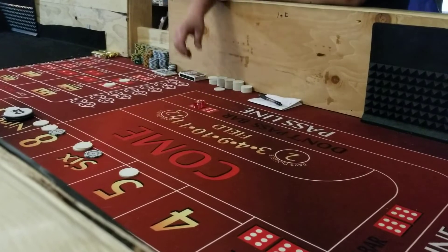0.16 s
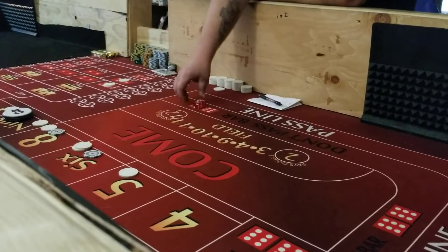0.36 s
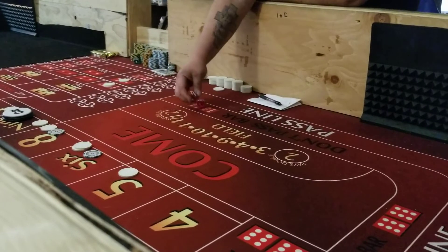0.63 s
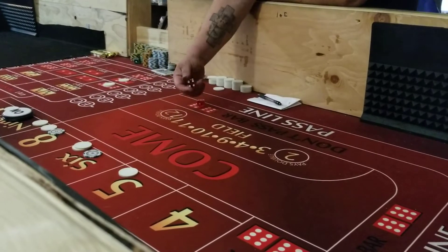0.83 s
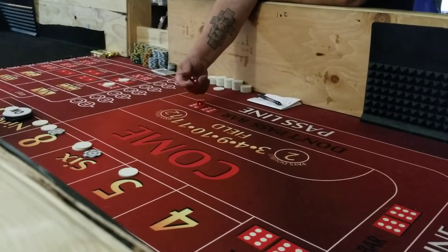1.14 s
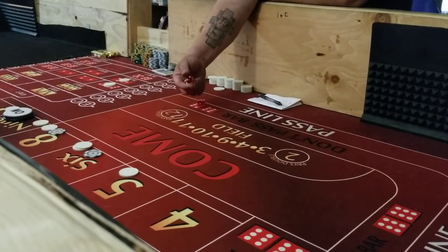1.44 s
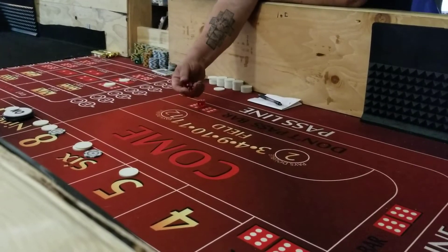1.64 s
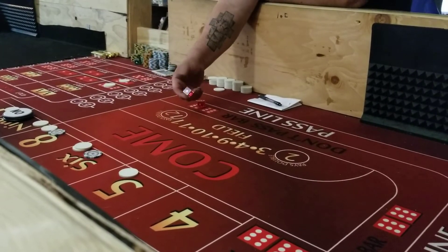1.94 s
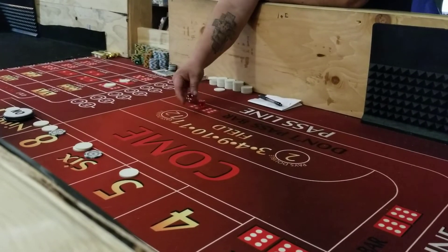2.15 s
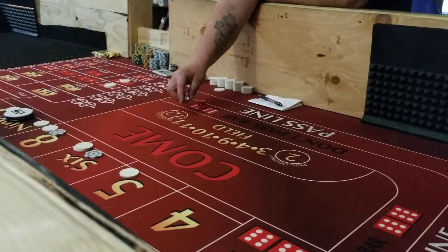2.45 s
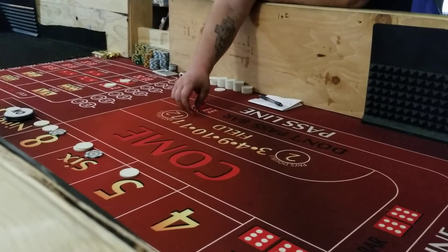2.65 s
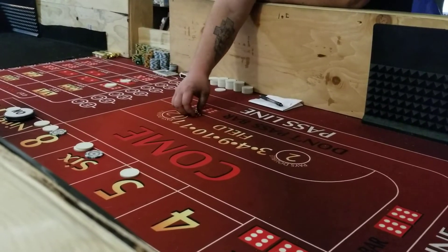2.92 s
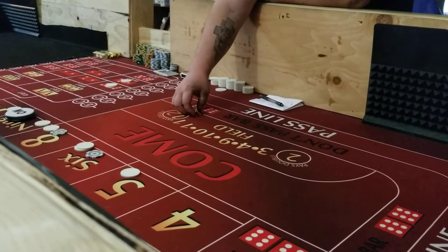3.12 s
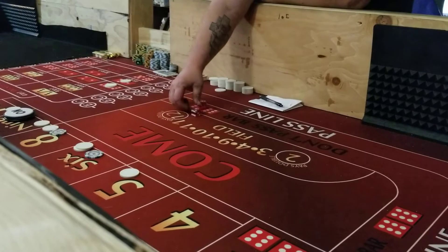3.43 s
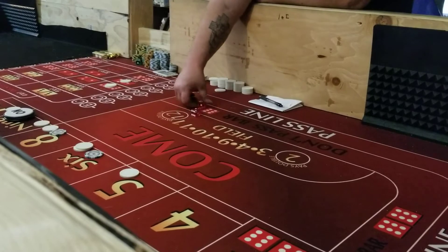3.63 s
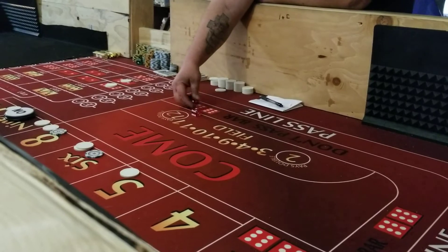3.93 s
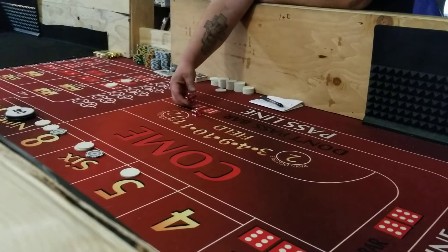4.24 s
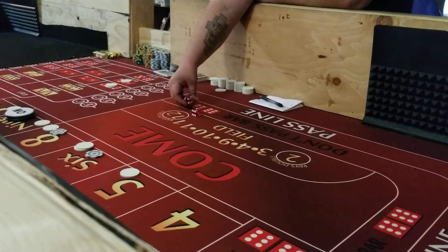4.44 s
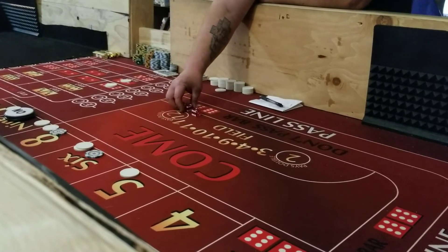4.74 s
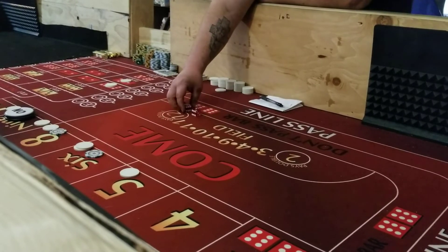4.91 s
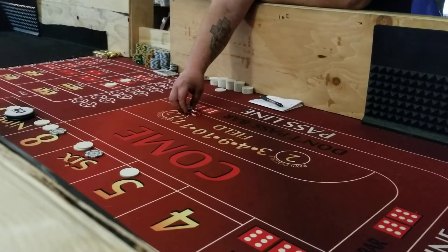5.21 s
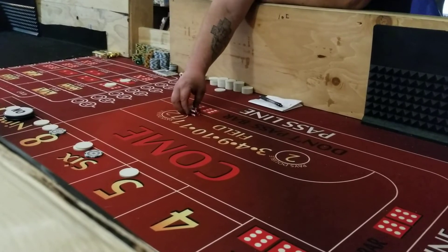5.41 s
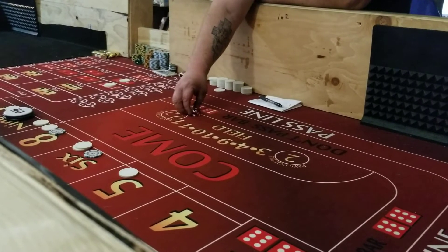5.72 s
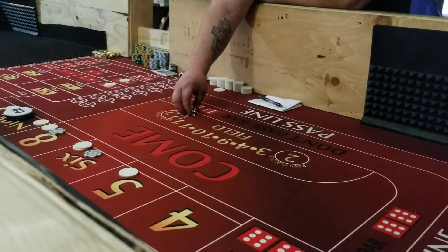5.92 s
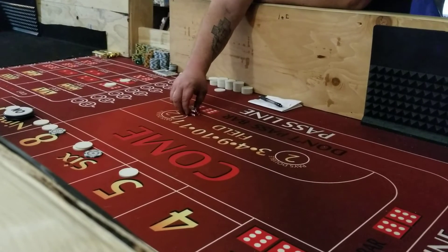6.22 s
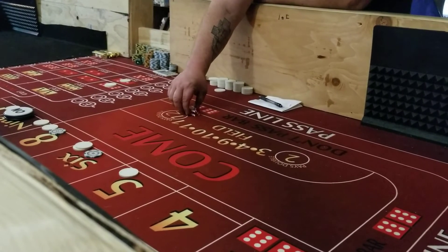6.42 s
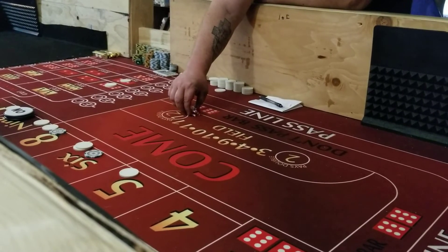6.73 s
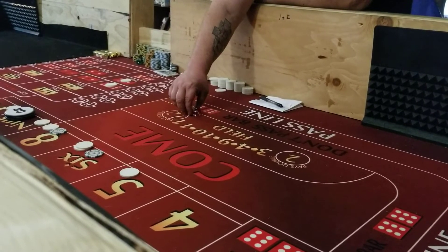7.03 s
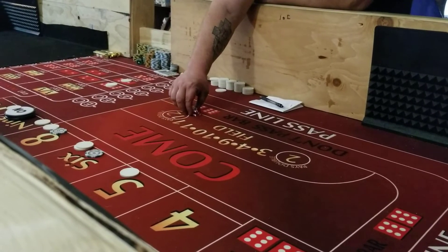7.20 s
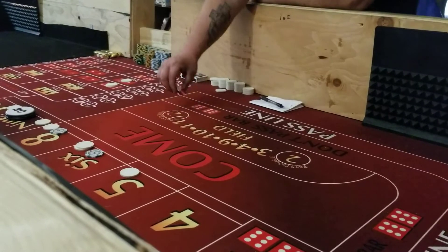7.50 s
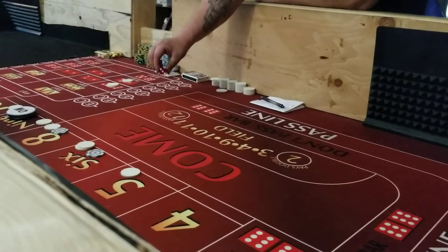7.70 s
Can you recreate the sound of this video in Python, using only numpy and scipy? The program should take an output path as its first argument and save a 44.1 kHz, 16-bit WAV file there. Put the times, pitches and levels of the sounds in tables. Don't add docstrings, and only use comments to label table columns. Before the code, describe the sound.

Close to a felt-covered wooden table, chips purr through a thumb and tick down in a quick run that thins to separate clacks. Dice and pieces then tap gently in the hand, with skin brushing cloth. A low double-bump thud lands midway, quiet follows, then small taps, crisp clicks and a longer swishing drag. Short indoor reverberation, steady faint hum, sound leaning to the right channel.

```python
import sys
import numpy as np
from scipy import signal
from scipy.fft import rfft, irfft, next_fast_len
from scipy.io import wavfile
from scipy.ndimage import uniform_filter1d

SR = 44100
rng = np.random.default_rng(int(sys.argv[2]) if len(sys.argv) > 2 else 0)


def volts(x):
    e = np.asarray(x, float) / 20
    return 10 ** e


def unload_audio(sound):
    columns = np.transpose(np.atleast_2d(sound))
    steps = np.round(np.clip(columns, -1, 1) * 32767)
    wavfile.write(sys.argv[1], SR, steps.astype(np.int16))


N = 346626
SIZE = next_fast_len(N + SR)
FREQ = np.maximum(np.arange(SIZE // 2 + 1) * SR / SIZE, 1)
STEP = 64

# [f/Hz, level/dB]
SHADOW = [(100, -7), (300, -3), (700, -3), (1500, -12.5), (6800, -10.5), (7500, -39), (8300, -4.5),
          (10000, 0.5), (13000, -15.5)]
# [f/Hz, level/dB]
KNOCK = [(150, -24), (400, -2), (800, 0), (1300, -13.5), (2200, -15), (3000, -32.5), (5000, -49)]


def curve(table, hz=FREQ):
    points, values = np.array(table).T[:2]
    return np.interp(np.log(hz), np.log(points), values)


def causal(table):
    size = 1024
    hz = np.maximum(np.arange(size // 2 + 1) * SR / size, 1)
    cepstrum = irfft(np.log(volts(curve(table, hz))))
    cepstrum[1:size // 2] *= 2
    cepstrum[size // 2 + 1:] = 0
    pulse = irfft(np.exp(rfft(cepstrum)))
    return rfft(pulse / np.abs(pulse).max(), SIZE)


def mode(hz, width):
    return 1j * FREQ * width / (hz ** 2 - FREQ ** 2 + 1j * FREQ * width)


def ring(modes):
    return sum((-1) ** k * volts(db) * mode(hz, width) * SR / width / 6
               for k, (hz, width, db) in enumerate(modes))


def noise(shape):
    x = rfft(rng.standard_normal(SIZE)) * shape
    return x / np.sqrt(np.mean(irfft(x, SIZE) ** 2))


def flicker(rate):
    k = int(SR / rate)
    held = np.repeat(rng.standard_normal(SIZE // k + 1), k)
    return uniform_filter1d(held, k)[:SIZE]


def room(direct):
    # [f/Hz, T60/s]
    room_t60 = [(150, 0.2), (500, 0.34), (2000, 0.32), (6000, 0.34), (13000, 0.23)]
    # [delay/s, level/dB]
    echoes = [(.0028, -4.5), (.006, -2), (0.016, -34), (0.028, -50)]
    # [f/Hz, level/dB]
    tail_db = [(150, -16), (1000, -13), (6000, -18.5), (13000, -28.5)]
    t = np.arange(SR // 2) / SR
    path = np.zeros(len(t))
    white = rfft(rng.standard_normal(len(t)))
    hz = np.maximum(np.arange(len(white)) * 2., 1)
    for centre in 60 * 2. ** np.arange(9):
        octave = np.cos(np.pi / 2 * np.clip(np.log2(hz / centre), -1, 1)) ** 2
        fade = 1000. ** (-t / curve(room_t60, centre)) * (1 - np.exp(-t / 0.0003))
        path += volts(curve(tail_db, centre)) * fade * irfft(white * octave, len(t))
    contact_s = 0.0003
    for delay, db in [(0.00092, 0), *echoes]:
        late = np.maximum(t - delay, 0)
        chatter = (t >= delay) * np.exp(-late / contact_s) * rng.standard_normal(len(t))
        path += 0.45 * direct * volts(db) * chatter
    path[:2] += direct * volts(-8) * np.array([1, -1])
    return rfft(path, SIZE)


def spots(times):
    turn = np.pi * (times * 7919 % 1 - .25)
    return np.array([np.cos(turn), np.sin(turn)])


def blows(times, db):
    train = np.zeros((2, SIZE))
    train[:, (times * SR).astype(int)] = volts(db) * spots(times)
    return rfft(train)


def rung(events, cycles, extras, level_db):
    s, db, hz, *rel_db = np.transpose(events)
    turns = np.arange(SR // 8) / SR * hz[:, None]
    age = np.pi * turns / cycles
    rings = volts(db + level_db)[:, None] * age * np.exp(1 - age) * np.sin(2 * np.pi * turns)
    train = np.zeros((2, SIZE))
    for start, sound, share in zip((s * SR).astype(int), rings, spots(s).T):
        train[:, start:start + len(sound)] += share[:, None] * sound
    return rfft(train) + sum(blows(s, db + level_db + r) * x for r, x in zip(rel_db, extras))


def background():
    # [f/Hz, level/dB]
    hum_lines = [(59.2, -63.5), (118.4, -64.5), (177.6, -75.5), (301.5, -74.5), (360.7, -75.5),
                 (422, -74.5), (581.4, -91.5), (640.6, -85)]
    # [f/Hz, level/dB per Hz]
    rumble = [(20, -34), (42, -8.5), (58, -3.5), (82, -15.5), (120, -11), (230, -10.5), (450, -16.5),
              (650, -25), (1000, -33), (2000, -38), (5000, -42), (9000, -43.5), (13000, -40), (16000, -39)]
    # [f/Hz, level/dB]
    rumble_shadow = [(100, 3), (300, -8.5), (1000, -6.5), (2500, -5), (5000, -1.5)]
    t = np.arange(SIZE) / SR
    hum = sum(volts(db + 2.5 + 2.13 * flicker(7)) * np.sin(2 * np.pi * (hz * t + rng.random()))
              for hz, db in hum_lines)
    likeness_hz, rumble_db = 515, -62
    shared = 1 / np.sqrt(1 + (FREQ / likeness_hz) ** 1.86)
    common = noise(1)
    shape = volts(curve(rumble))
    shape = shape * volts(rumble_db) / np.sqrt(np.mean(shape ** 2))
    ports = [shape * (np.sqrt(shared) * common + np.sqrt(1 - shared) * noise(1)) + rfft(hum)
             for _ in range(2)]
    lean = volts(curve(rumble_shadow) / 2)
    return irfft([ports[0] * lean, ports[1] / lean], SIZE)


def strokes(table):
    s, rise, hold = np.abs(np.array(table)[:, :3].T[:, :, None])
    t = np.arange(SIZE // STEP + 1) * STEP / SR
    fall = 0.081 + rise
    return volts(-20 * (np.maximum(s - t, 0) / rise + np.maximum(t - s - hold, 0) / fall))


def grain(gain, shape, hz):
    smooth = uniform_filter1d(np.repeat(gain, STEP)[:SIZE], size=300)
    gain = smooth * volts(4 + 1.6 * flicker(60))
    sides = volts(np.array([[curve(SHADOW, hz)], [0]]))
    return sides * gain * irfft([noise(shape), noise(shape)], SIZE)


def rubs():
    # [full pressure t/s, rise/s, hold/s, level/dB, centre f/Hz]
    scrapes = [(2.425, 0.049, 0.076, -67.5, 2650), (3.36, 0.028, .003, -60.5, 1900),
               (3.404, .04, .01, -68, 1290), (3.513, 0.077, 0.069, -67, 2320),
               (3.896, 0.041, 0.076, -69, 1660), (4.06, .015, .003, -79, 2140),
               (4.526, 0.035, .01, -72.5, 2120), (4.767, .02, 0.0089, -69, 1610),
               (4.922, 0.072, .09, -81, 2050), (5.641, 0.014, .003, -57.5, 1850),
               (7.168, 0.029, .01, -61, 2100), (7.209, 0.043, .03, -56, 1750),
               (7.39, 0.11, 0.083, -55, 2130), (7.31, .1, 0.26, -71, 3370), (7.595, 0.22, 0.2, -56, 2150)]
    # [full speed t/s, rise/s, hold/s, swish level/dB, fizz level/dB]
    brushes = [(2.42, 0.032, 0.11, -60, -57.5), (3.238, .07, .003, -98, -78), (3.37, 0.08, .01, -74, -69.5),
               (3.52, 0.085, 0.031, -77, -64.5), (3.63, 0.035, 0.034, -87, -81), (3.75, .04, .02, -96, -82),
               (3.884, .02, .01, -82, -79), (4.052, .015, .01, -76, -83), (4.862, .04, .003, -96, -83),
               (4.99, 0.16, 0.047, -76.5, -71.5), (5.578, .012, 0.018, -73, -70),
               (5.64, .012, 0.017, -78, -76), (7.14, .02, .005, -70.5, -83), (7.32, 0.23, .2, -66.5, -71),
               (7.59, .1, 0.12, -59, -62)]
    # [full weight t/s, rise/s, hold/s, level/dB]
    drags = [
        (7.14, 0.021, 0.0046, -63),
        (7.2, 0.03, 0.3, -64.5),
        (7.59, 0.1, 0.014, -56),
        (7.7, .1, .2, -67.5),
    ]
    # [f/Hz, level/dB]
    swish = [(2000, -6), (2700, -10.5), (4500, -3.5), (6800, -0.5), (7700, -2), (8300, -16), (10500, -13.5),
             (12000, -38)]
    fizz = [(8500, -24), (11000, -7.5), (12300, 0), (14500, -1), (16000, -13)]
    low_drag = [(150, -0.5), (300, -4.5), (650, -4.5), (1200, -13), (2000, -11)]
    out = 0
    for table, column, colour in [(brushes, 3, swish), (brushes, 4, fizz), (drags, 3, low_drag)]:
        shape = volts(curve(colour)) * (FREQ > colour[0][0]) * (FREQ < colour[-1][0])
        gain = volts(np.array(table)[:, column]) @ strokes(table)
        out = out + grain(gain, shape, colour[2][0])
    scrape_octaves, skirt_db = 0.15, -7
    db, centre = np.array(scrapes)[:, 3:].T
    for hz in 1100 * 2 ** (np.arange(8) / 4):
        near = np.exp(-(np.log2(hz / centre) / scrape_octaves) ** 2 / 2) + volts(skirt_db)
        band = np.exp(-(np.log2(FREQ / hz) / 0.4) ** 2)
        out = out + grain(volts(db - 8) * near @ strokes(scrapes), band, hz)
    return out


def earlier_knock():
    return blows(np.array([-0.047]), -37.5) * mode(1120, 2440) ** 2 * 12


def thuds():
    # [t/s, peak level/dB, pitch f/Hz, knock level/dB over thud]
    board_thuds = [(0.261, -31.5, 83, -4.5), (0.282, -46, 122, -12), (0.334, -37, 111, -25),
                   (0.417, -35, 118, -24), (0.554, -38, 131, -20), (1.203, -46, 229, -5),
                   (2.703, -35.5, 152, -14.5), (2.714, -41, 206, -30), (4.054, -47.5, 203, -13),
                   (4.739, -33, 118, -13), (6.951, -45, 200, -6), (7.399, -60, 120, -17),
                   (7.599, -50.5, 118, -9), (7.699, -58, 330, -9)]
    # [t/s, peak level/dB, pitch f/Hz, knock level/dB over thud]
    bump = [
        (4.7095, -37, 248, 3),
        (4.717, -33.5, 300, -5.5),
        (4.727, -35, 300, -2),
        (4.735, -43, 310, -7),
        (4.747, -52, 283, -2),
        (4.763, -53, 260, -13),
        (4.783, -55, 220, -12),
        (4.82, -60, 347, -9),
    ]
    return rung(np.vstack([board_thuds, bump]), 1.37, [causal(KNOCK)], -8.0)


def flecks():
    # [t/s, peak level/dB, ring f/Hz]
    nail_flecks = [
        (2.732, -59, 6700),
        (2.7544, -74, 6590),
        (5.574, -62, 4370),
        (5.6385, -60, 4200),
        (6.4103, -65, 5860),
    ]
    return rung(nail_flecks, 5.3, [], 1.5)


def taps():
    # [t/s, peak level/dB, ring f/Hz, tick level/dB over ring, body level/dB over ring]
    soft_taps = [(0.4484, -35, 1880, -4, -4), (1.92, -79, 1400, -14, 19), (1.9494, -83, 1340, -16, 12),
                 (2.9776, -54, 1910, -10.5, -9), (3.3578, -53.5, 1930, 2, 4.5),
                 (3.3844, -55, 1390, -22, -4), (3.4665, -53.5, 1940, 2, -8), (3.5179, -45, 2470, 1.5, -36),
                 (3.5594, -58, 2360, -13, -3), (3.8791, -48, 1660, -14.5, -9), (3.9399, -60, 1840, -22, -7),
                 (4.0527, -61.5, 2090, -2, 11.5), (5.5727, -44, 2140, -14, -17),
                 (5.5994, -49, 1990, -7, -17), (5.6376, -43, 1820, -2.5, -10), (5.665, -59, 1700, -19, -13)]
    # [f/Hz, width/Hz, level/dB]
    tap_tick = [(4260, 640, -10), (5940, 570, 0), (7300, 320, 3), (12300, 1600, 2)]
    return rung(soft_taps, 4, [ring(tap_tick), causal(KNOCK)], -6.5)


def riffle():
    chips = 24
    start_s, gap_s, jitter_s = 0.1627, 0.01195, 0.0018
    tick_db, clack_db, board_db = -27.5, -25.5, -43.5
    tick_scatter_db, clack_scatter_db, board_scatter_db = 1.5, 2, 3.5
    along = np.arange(chips)
    s = start_s + gap_s * along + jitter_s * rng.standard_normal(chips) * (along > 0)
    sag = -1.5 * along / chips - 4.5 * (along == 0)
    miss = rng.exponential(size=(chips, 3)).T
    tick = tick_db + sag - tick_scatter_db * miss[0]
    clack = clack_db + sag - clack_scatter_db * miss[1]
    board = board_db + sag - board_scatter_db * miss[2]
    return np.transpose([s, tick, clack - tick, board - tick])


def clicks():
    # [t/s, tick peak level/dB, clack level/dB over tick, board level/dB over tick]
    lone_clicks = [(0.4682, -36.5, 8.5, -9), (0.5387, -29, 2, -16.5), (0.5663, -36, 4, -16),
                   (0.6729, -28.5, 2.5, -17.5), (0.7019, -33.5, 2.5, -11), (0.7244, -30.5, 3, -20.5),
                   (0.7453, -35, 3.5, -12.5), (0.7637, -34.5, 3.5, -14.5), (0.7818, -37.5, 4, -6.5),
                   (0.8088, -38.5, 7.5, -10.5), (0.827, -35.5, 4, -34), (0.846, -36, -5, -12),
                   (0.8653, -42.5, 9.5, -7), (0.8873, -35.5, 4, -13.5), (0.9145, -38.5, 3.5, -17),
                   (1.0061, -29.5, 2.5, -19), (1.1135, -46.5, 7.5, -6.5), (1.1983, -31.5, 2.5, -15.5),
                   (1.281, -31, 2, -19), (1.4316, -31, 3, -18.5), (1.5489, -31.5, 3, -16.5),
                   (1.613, -45.5, 3.5, -9), (2.0087, -29.5, 4, -13), (6.9477, -27.5, 1.5, -14.5),
                   (6.9694, -38.5, 5.5, -9.5), (7.0862, -32, 3, -17)]
    # [f/Hz, level/dB]
    tick_colour = [(7000, -42.5), (9000, -20), (10800, -10.5), (12200, -4), (13200, -1), (14300, -4),
                   (15500, -5), (17000, -13.5)]
    clack_colour = [(600, -11.5), (1100, -8.5), (1600, -3.5), (2300, -3), (3200, -3), (4500, -3),
                    (5800, -4.5), (7200, 0.5), (7900, -5.5), (8500, -16.5), (10000, -32.5), (12000, -38)]
    # [f/Hz, width/Hz, level/dB]
    board_modes = [(234, 99, -2), (300, 43, -0.5), (447.6, 32, -4.5), (685, 48, -1.5), (924, 77, -15),
                   (1175, 29, -8), (1499, 9.3, -22), (1930, 34, -1), (2520, 50, -14), (3696, 27, -3),
                   (5740, 220, -36)]
    s, db, clack_db, board_db = np.vstack([riffle(), lone_clicks]).T
    s = s + .0008
    tick = blows(s, db + 6.5) * causal(tick_colour)
    clack = blows(s, db + clack_db) * causal(clack_colour)
    board = blows(s, db + board_db - 10) * ring(board_modes)
    bare = volts(-5) * tick.sum(axis=0)
    return bare, tick + clack + board


def scene():
    near_paths = [room(1), room(1)]
    far_paths = [room(.12), room(.12)]
    steady = rubs() + background()
    bare, hits = clicks()
    hits = hits + taps() + flecks() + thuds() + earlier_knock()
    low_cut_hz = 105
    hits = hits * (FREQ ** 2 / (FREQ ** 2 - low_cut_hz ** 2 - 1.4j * FREQ * low_cut_hz))
    right = bare * 0.48 + (hits * near_paths).sum(axis=0)
    far = (hits * far_paths).sum(axis=0)
    shared = 1 / (1 + (FREQ / 400) ** 2)
    shadow = causal(SHADOW)
    shadow_gain = volts(SHADOW[0][1]) / np.abs(shadow[0])
    left = (np.sqrt(shared) * right + np.sqrt(1 - shared) * far) * shadow * shadow_gain
    return (irfft([left, right], SIZE) + steady)[:, :N]


def band_limit(x):
    return signal.sosfilt(signal.butter(12, 16790, fs=SR, output="sos"), x)


def record(dry):
    # [f/Hz, level/dB]
    top_rolloff = [(15600, 0), (15900, -22)]
    mix = irfft(rfft(dry, SIZE) * volts(curve(top_rolloff)), SIZE)[:, :N]
    return band_limit(mix)


dry = scene()
out = record(dry)
unload_audio(out)
```